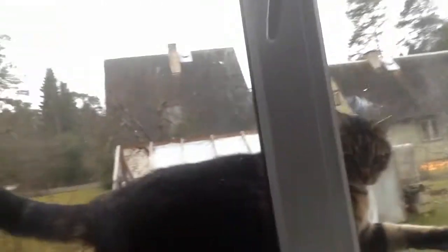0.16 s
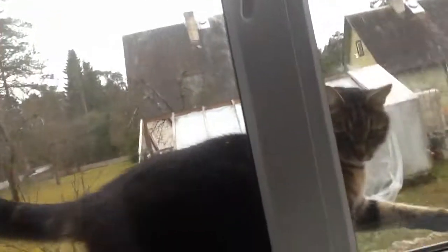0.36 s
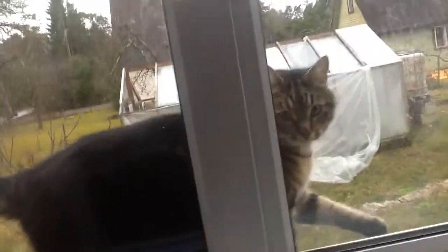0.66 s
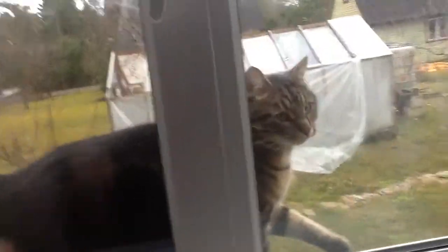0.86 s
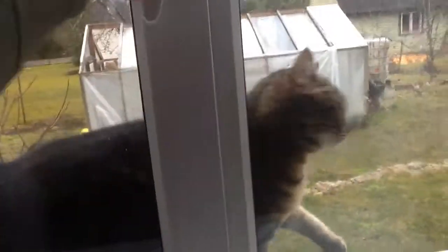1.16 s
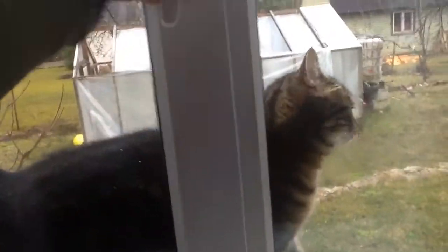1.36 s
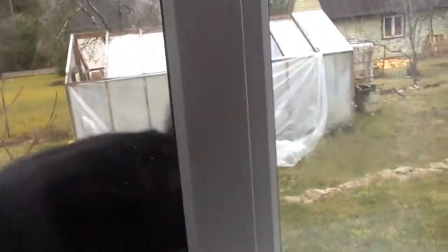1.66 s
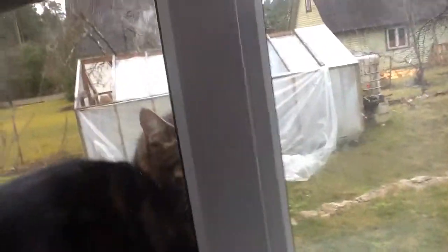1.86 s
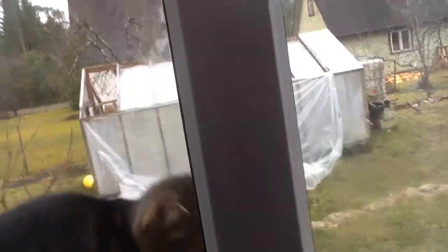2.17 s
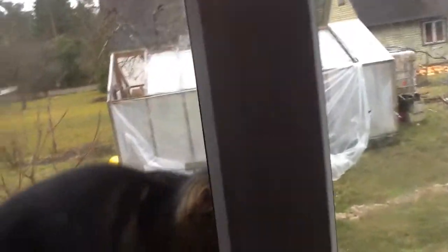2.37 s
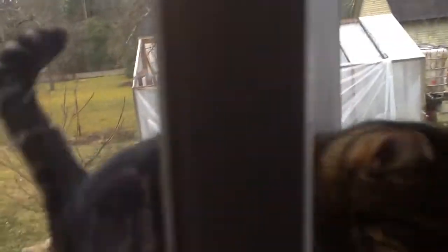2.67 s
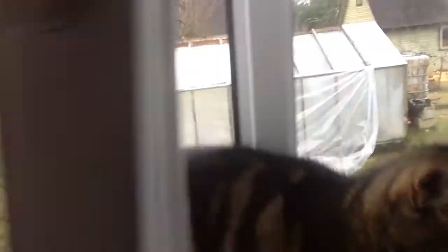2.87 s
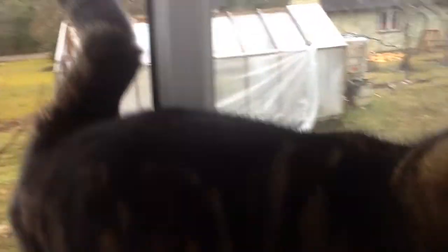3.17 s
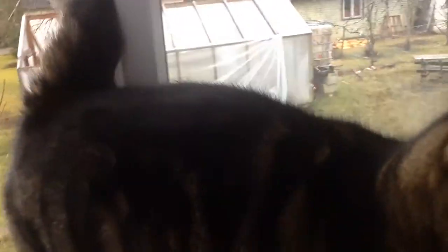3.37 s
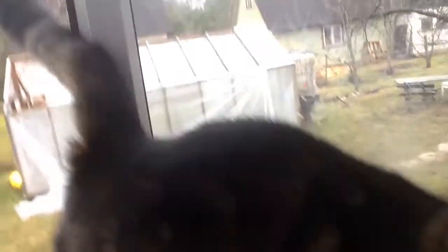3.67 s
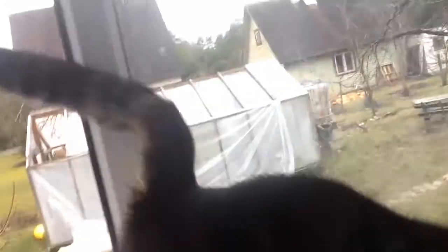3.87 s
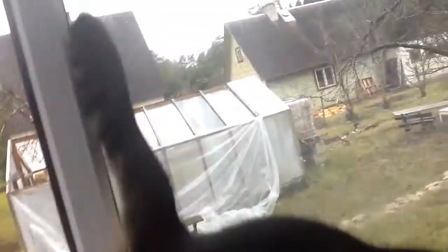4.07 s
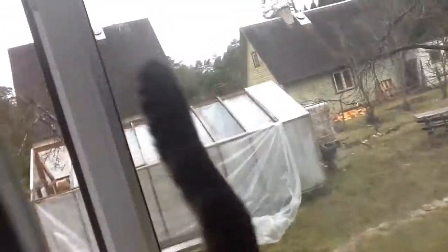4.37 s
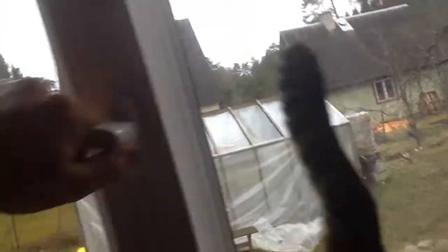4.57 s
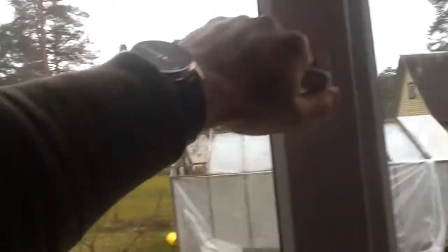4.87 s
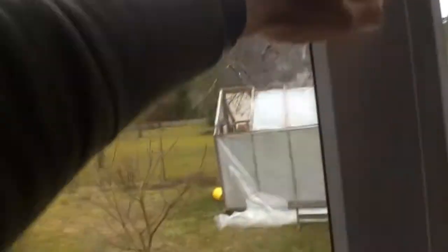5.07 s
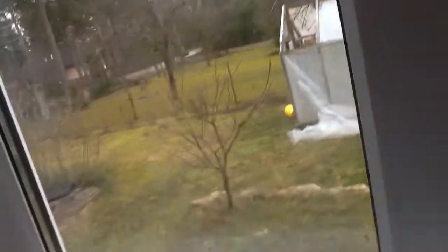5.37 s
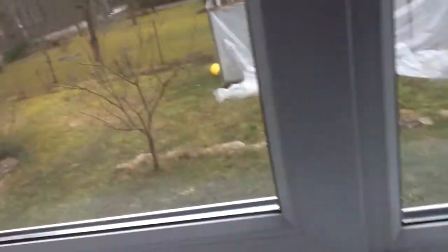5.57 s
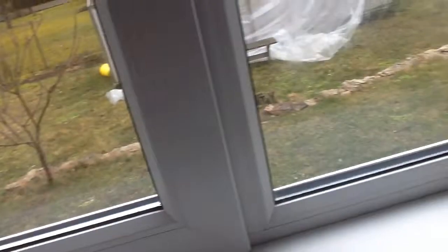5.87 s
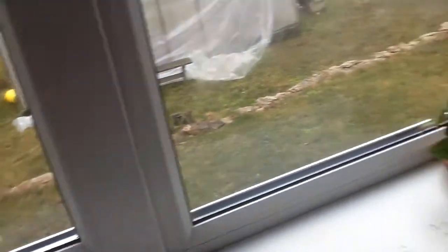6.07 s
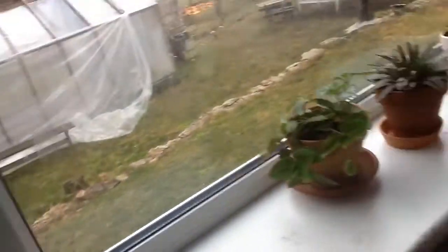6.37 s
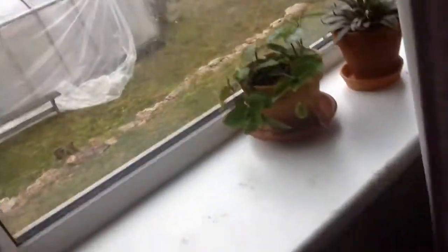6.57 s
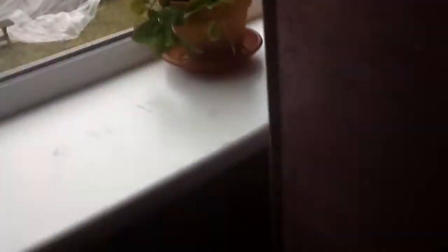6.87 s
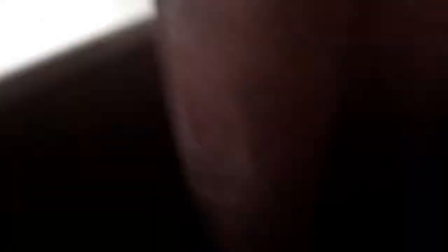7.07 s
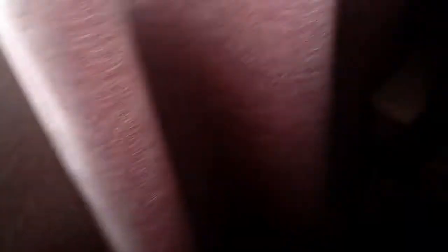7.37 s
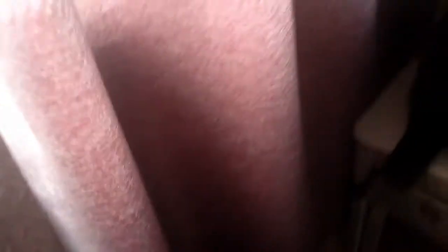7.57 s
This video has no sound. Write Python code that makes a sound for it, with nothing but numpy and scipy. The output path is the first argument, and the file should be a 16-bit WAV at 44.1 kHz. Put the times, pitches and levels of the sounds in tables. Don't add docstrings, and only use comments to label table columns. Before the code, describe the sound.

A window at arm's length in a small furnished room, heard through a hand-held phone with faint steady hiss. From 0 to 1 s, soft handling rumble, a few dull knocks around 0.3 and 0.6 s, and a faint hinge squeak. A sharp dry snap at 1.1 s opens a busy run of latch clicks, woody knocks, scrapes and rubbing, densest at 1.35-1.65 s, with further clacks at 1.8 and 1.95 s. Then it turns very quiet: a small tick at 2.5 s, soft padded thuds near 2.7-3.0 s, barely audible squeaks, light clicks at 4.15-4.4 s. At 4.93 s the sash slams, by far the loudest event, a double-contact bang with bright metallic crack and short pane ring. Latch clicks follow, low thumps and frame groans at 5.3-6.1 s, small ticks at 6.55 s, curtain rustling around 6.7-7.2 s, a knock at 7.23 s, and a faint tap at 7.6 s.

```python
import sys
import numpy as np
from scipy import signal
from scipy.fft import rfft, irfft, next_fast_len
from scipy.io import wavfile
from scipy.ndimage import uniform_filter1d

SR = 44100
rng = np.random.default_rng(int(sys.argv[2]) if len(sys.argv) > 2 else 0)


def master(y):
    cut = np.clip(np.atleast_2d(y).T, -1, 1)
    pcm = np.round(cut * 32767)
    wavfile.write(sys.argv[1], SR, pcm.astype(np.int16))


def nominal_scale(level):
    x = np.asarray(level, float) / 20
    return 10 ** x


N = 340893

# frequency in Hz, width in Hz, level in dB.
FRAME_MODES = [(136.2, 55, -4.5), (170.8, 20.2, 2), (213.4, 12.6, -2.5), (261.1, 8.9, -0.5),
               (298, 9.5, -0.5), (393.6, 51, -2.5), (476, 40, -5.5), (580.4, 9.6, -5)]


def unit(x):
    return x / np.sqrt(np.mean(x ** 2))


def ring(x, hz, width):
    hz = min(hz, 0.45 * SR)
    return signal.lfilter(*signal.iirpeak(hz, hz / max(width, 5), SR), x)


def body(x, modes, count=1):
    total = 0
    for k, (hz, width, db) in enumerate(modes):
        total = total + (-1) ** (k // count) * nominal_scale(db) * ring(x, hz, width)
    return total


def grit(count, spread_db):
    size = np.minimum(rng.exponential(size=count), 4)
    return unit(rng.standard_normal(count) * nominal_scale(spread_db * size))


def walk(rate):
    hold = int(SR / rate)
    levels = np.repeat(rng.standard_normal(N // hold + 1), hold)
    return 1.24 * uniform_filter1d(levels, hold)[:N]


def fade(t, rise, t60):
    return (1 - np.exp(-t / max(rise, 1e-4))) * np.exp(-np.log(1000) * t / max(t60, 0.003))


def add(out, s, x):
    i = int(s * SR)
    out[i:i + len(x)] += x[:len(out) - i]


def hiss_and_air():
    # frequency in Hz, density in dB per Hz.
    spectrum = [(30, -14), (100, -28), (145, -5.5), (296, 0.5), (520, -7.5), (2000, -9.5), (10200, -14.5),
                (15300, -15.5)]
    hz, db = np.transpose(spectrum)
    size = next_fast_len(N)
    gain = nominal_scale(np.interp(np.log(np.fft.rfftfreq(size, 1 / SR) + 1), np.log(hz), db))
    noise = irfft(rfft(rng.standard_normal(size)) * gain, size)[:N]
    return unit(noise) * nominal_scale(-64 + 0.3 * walk(2))


def pressure():
    # time in seconds, level in dB.
    bustle = [(0, -53.5), (1.0, -56), (1.62, -55.5), (1.71, -69), (2.15, -79), (2.42, -67), (2.9, -67.5),
              (3.4, -71.5), (4.2, -73), (4.5, -70.5), (4.88, -62), (5.2, -58.5), (5.5, -62.5), (6.0, -66),
              (6.25, -61.5), (7.0, -55.5), (7.22, -73), (7.73, -97)]
    bustle_db = (-2.5, -1.5, -5, -6)
    # start in seconds, length in seconds, rumble in dB, scrape in dB above rumble.
    shifts = [(0, 0.087, -46, 0), (0.266, 0.2, -54.5, 7.5), (1.047, 0.19, -47.5, -6),
              (1.326, 0.1, -48.5, -4), (1.378, 0.29, -42.5, 1), (1.407, 0.076, -40, 4.5),
              (1.736, 0.069, -53, 4.5), (1.761, 0.23, -43, -1), (1.912, 0.18, -52.5, -6),
              (2.468, 0.2, -67.5, 3), (2.73, 0.097, -74, -1), (2.93, 0.07, -56, 1), (2.985, 0.13, -56, 1),
              (4.41, 0.037, -68, 6), (5.05, 0.082, -39, -1), (5.279, 0.12, -51, -6.5),
              (5.431, 0.078, -41.5, -2), (5.575, 0.11, -38, -18), (5.721, 0.11, -36.5, -25),
              (5.874, 0.086, -53, -14), (6.032, 0.1, -47, -8), (6.26, 0.21, -60.5, -16),
              (6.63, 0.089, -57, -3.5), (7.031, 0.14, -52.5, 9.5), (4.62, 0.5, -68, 6),
              (7.229, 0.13, -48.5, 6), (7.408, 0.07, -60.5, 2.5), (7.571, 0.031, -54.5, -16),
              (6.715, 0.047, -51, -7), (5.346, 0.05, -45, -8)]
    # middle in seconds, length in seconds, rasp in dB, hiss in dB above rasp.
    sweeps = [(0.066, 0.11, -73, -9), (.36, .11, -68, -9), (0.755, 0.075, -61.5, 14.5),
              (0.802, 0.15, -59, 1), (0.918, 0.31, -67.5, 10.5), (1.09, 0.094, -50, -2),
              (1.19, 0.071, -52, -4), (1.34, 0.025, -59.5, 14.5), (1.41, 0.15, -40.5, -8),
              (1.417, 0.034, -39, 1.5), (1.439, 0.03, -40.5, -2), (1.541, 0.14, -46.5, -9),
              (1.598, 0.11, -66, -13), (1.832, 0.26, -58.5, -12), (4.152, 0.25, -60, -12),
              (4.356, 0.29, -61.5, -11), (4.958, 0.073, -33, -22), (5.052, .11, -49, -24),
              (5.335, 0.1, -56.5, 5.5), (5.623, 0.17, -50, -11), (5.84, .09, -57, -8),
              (5.535, 0.053, -57, -2), (5.272, .06, -53.5, -13), (6.054, 0.087, -61, -3),
              (6.659, 0.057, -50.5, -2.5), (6.737, 0.084, -54, -10), (6.856, 0.15, -50.5, 2),
              (6.997, 0.17, -55, 3), (7.097, 0.048, -54, 13), (7.118, 0.12, -53, 9.5),
              (7.274, 0.11, -49, -10)]
    rise_s, sag_db, end_s = 0.02, -14, 0.06
    edge_db = -17

    t = np.arange(N) / SR
    busy_db = np.interp(t, *np.transpose(bustle))
    gains = [nominal_scale(busy_db + db) for db in bustle_db[:3]]
    gains.append(nominal_scale(-58 + bustle_db[3] + 0.36 * (busy_db + 61)))
    power = np.array(gains) ** 2
    for s, length, db, scrape_db in shifts:
        age = np.maximum(t - s, 0)
        fall_db = sag_db * age / length - 20 * np.maximum(age - length, 0) / end_s
        shape = np.minimum(age / rise_s, 1) * nominal_scale(fall_db)
        power[:2] += (nominal_scale(db + np.array([[0], [scrape_db]])) * shape) ** 2
    for s, length, db, hiss_db in sweeps:
        swell_db = edge_db * (2 * (t - s) / length) ** 2
        power[2:] += nominal_scale(db + np.array([[0], [hiss_db]]) + swell_db) ** 2
    return np.sqrt(power)


def rubbing():
    # frequency in Hz, width in Hz, level in dB.
    seal_modes = [(528, 180, 2), (950, 480, -0.5), (1570, 1110, -7)]
    rasp_modes = [(2700, 5060, 0), (4020, 3470, 3)]
    hiss_modes = [(5700, 5140, -0.5), (9660, 8500, -0.5), (13660, 4800, -3.5)]
    heavy, firm, light, soft = pressure()
    press = walk(40)
    damped_frame = [(hz, 1.55 * width, db) for hz, width, db in FRAME_MODES[:6]]
    rumble = unit(body(grit(N, 3.36), damped_frame)) * heavy * nominal_scale(2 * press)
    scrape = unit(body(grit(N, 3.9), seal_modes)) * firm * nominal_scale(-3 + press)
    rasp = unit(body(grit(N, 4.9), rasp_modes)) * light * nominal_scale(-6 + press)
    hiss = unit(body(grit(N, 4.5), hiss_modes)) * soft * nominal_scale(-6 + 0.5 * press)
    return rumble + scrape + rasp + hiss


def blows():
    # start in seconds, body in dB, hardness as knock in dB above body, ring t60 in seconds.
    impacts = [(0.048, -59, 0, 0.2), (0.306, -41, -12, 0.072), (0.354, -34, -3.5, 0.16),
               (0.581, -43.5, -9, 0.14), (0.934, -39, -29, 0.16), (1.053, -40.5, -3.5, 0.51),
               (1.369, -35.5, 14.5, 0.12), (1.405, -32.5, 2, 0.14), (1.788, -46.5, 13.5, 0.083),
               (2.027, -40, -24, 0.15), (2.729, -51.5, -14, 0.2), (2.937, -54.5, -10, 0.1),
               (3.015, -45, -23, 0.18), (4.9295, -24.5, 4.5, 0.23), (4.944, -20, -5.5, 0.2),
               (5.057, -40, -1, 0.096), (5.299, -46, -15, 0.15), (5.439, -41.5, -8, 0.19),
               (5.577, -31, -26, 0.15), (5.597, -28.5, -18, 0.14), (5.63, -31.5, -26, 0.12),
               (5.728, -35.5, -34, 0.2), (5.754, -33, -25, 0.12), (5.821, -38, -20, 0.08),
               (5.845, -35.5, -22, 0.042), (5.901, -45, -19, 0.2), (6.045, -43, -10, 0.15),
               (6.083, -37, -23, 0.065), (7.024, -32, -5.5, 0.06), (7.232, -32, 2, 0.17)]
    # frequency in Hz, width in Hz, level in dB.
    wall_modes = [(32, 20, -2), (112, 30, -3)]
    knock_modes = [(720, 630, 8), (1030, 410, 13), (1330, 850, 7.5), (1940, 580, -3.5)]
    crack_modes = [(3100, 1100, 18), (4230, 1900, 19), (6740, 3800, 17), (8500, 2700, -33)]
    out, t = np.zeros(N), np.arange(SR // 2) / SR
    for s, db, hard_db, t60 in impacts:
        rattle = grit(len(t), 8.4) * fade(t, 0.00049, 0.5 * t60)
        contact = nominal_scale(13.5 + 0.2 * min(hard_db, 0)) * t * np.exp(-t / 0.00044) / 0.00084
        push = rattle + contact
        low = body(push, FRAME_MODES, count=3)
        low = low / np.abs(low).max()
        wall = body(push, wall_modes, count=2)
        wall = wall / np.abs(wall).max()
        knock = unit(body(grit(len(t), 6.5), knock_modes)) * fade(t, 0.00027, 0.98 * t60)
        crack = unit(body(grit(len(t), 29), crack_modes)) * fade(t, 0.00087, 0.18 * t60)
        wall_db = -25 + 0.6 * (db + 36)
        crack_db = -8 + 0.71 * hard_db
        blow = low + nominal_scale(wall_db) * wall + nominal_scale(hard_db - 9) * knock + nominal_scale(crack_db) * crack
        add(out, s, nominal_scale(db) * blow)
    return out


def rings():
    # start in seconds, peak in dB, ring in Hz, t60 in seconds.
    tapped_parts = [(1.05, -43, 525, .06), (1.482, -34, 1356, 0.038), (1.87, -36, 750, 0.032),
                    (2.478, -46, 2630, 0.028), (2.48, -47.5, 1594, 0.039), (2.62, -58, 1110, .05),
                    (2.995, -56, 557, .05), (3.011, -52, 882, .09), (3.015, -52, 618, 0.1),
                    (4.929, -23, 870, 0.064), (4.931, -33, 1336, 0.05), (4.932, -25.5, 567, .15),
                    (4.935, -29, 108, .3), (4.94, -27, 200, .15), (4.945, -24, 937, 0.066),
                    (4.94, -36, 383, .15), (5.1, -45, 84.8, 0.26), (4.9547, -25, 4100, .012),
                    (5.062, -36, 569, .05), (5.065, -38, 131, .2), (5.09, -40, 585, 0.066),
                    (5.578, -40, 677, 0.081), (5.579, -37.5, 454, 0.087), (5.582, -42, 873, .1),
                    (5.594, -32, 191, .1), (5.598, -36, 610, .1), (5.598, -34.5, 341, 0.15),
                    (5.625, -48, 1090, 0.045), (5.727, -36, 409, .15), (5.73, -52, 870, 0.093),
                    (5.74, -37, 180, .12), (5.75, -43, 500, .07), (5.755, -43, 762, 0.082),
                    (5.775, -42, 500, .07), (5.775, -39, 238, .15), (5.815, -50, 168.7, 0.05),
                    (5.82, -39, 237, 0.08), (5.895, -51, 200, 0.1), (5.89, -58.5, 995, 0.33),
                    (6.047, -47, 221, 0.14), (6.547, -40, 780, 0.029), (6.5382, -39, 1520, 0.014),
                    (7.238, -38.5, 254, 0.1), (7.42, -59.5, 179, 0.33), (7.582, -48, 210, .06),
                    (0.049, -38, 520, .03), (0.309, -37, 300, .05), (1.949, -40, 3370, 0.011),
                    (5.44, -56, 1500, .04),
                    (1.332, -39, 2700, .025), (1.333, -42, 4750, .02), (1.334, -43, 1400, .02),
                   (1.167, -49, 3600, .02), (1.482, -40, 2150, .015), (4.933, -22.5, 3130, .035),
                   (4.9285, -30, 800, .02), (5.056, -38, 2500, 0.018), (5.062, -37, 1200, .03),
                   (5.066, -42, 1800, .05), (5.103, -48, 3130, .03), (1.791, -36, 970, .03),
                   (1.806, -40, 1250, .03), (1.85, -46, 860, .03), (4.421, -54, 2800, .02),
                   (7.019, -39, 622, .02), (7.02, -46, 1620, .012), (7.233, -37, 1480, .025),
                   (7.256, -44, 3300, .015), (7.26, -39, 700, .04), (1.278, -48, 1250, .012),
                   (1.124, -46, 1100, .015), (2.997, -50, 540, .015), (5.316, -52, 9500, .03),
                   (5.368, -47, 6900, 0.016), (5.598, -29, 328, 0.037), (5.583, -33, 380, .05),
                   (5.6, -36.5, 850, .05), (1.949, -37, 5700, 0.019), (1.95, -38, 6500, 0.019),
                   (2.478, -51, 3500, .015), (7.582, -48, 800, .01), (5.632, -35, 300, .04),
                   (5.61, -38, 450, .06), (5.735, -37, 480, .06), (5.79, -41, 350, .06),
                   (5.84, -42, 327, .05), (5.408, -40, 390, 0.011), (5.439, -47, 1900, .03),
                   (5.652, -47, 1500, .02), (1.483, -33, 1010, .02), (1.514, -40, 1920, .015),
                   (1.622, -40, 1360, .015), (1.622, -46, 3000, .01), (1.794, -37, 700, .04),
                   (1.797, -39, 1700, .03), (7.582, -48, 1860, .01), (7.6075, -49, 1300, .01),
                   (.31, -38, 420, .02), (.937, -42, 240, .03), (.385, -42, 250, .03),
                   (1.42, -31, 800, 0.033), (1.44, -36, 1100, .02)]
    out, t = np.zeros(N), np.arange(SR // 2) / SR
    for s, db, hz, t60 in tapped_parts:
        add(out, s, nominal_scale(db) * fade(t, 0.9 / hz, t60) * np.sin(2 * np.pi * hz * t))
    return out


def hard_points(table, share):
    out, t = np.zeros(N), np.arange(SR // 8) / SR
    for s, db, hz, t60 in table:
        click = nominal_scale(9.5) * (t == 0)
        push = (click + rng.standard_normal(len(t))) * fade(t + 0.00018, 0.00015, t60)
        width = 1.55 * share * hz
        tick = ring(ring(push, hz, width), hz, width)
        add(out, s, nominal_scale(db - 3.5) * tick / np.abs(tick).max())
    return out


def dry_snaps():
    # start in seconds, peak in dB, ring in Hz, t60 in seconds.
    snap_table = [(0.0498, -58, 3000, 0.019), (0.36, -46, 5200, 0.01), (1.096, -20.5, 2800, 0.0069),
                  (1.332, -31.5, 3600, 0.016), (1.3733, -25, 3200, 0.028), (1.946, -38, 6000, 0.006),
                  (6.6593, -37.5, 3000, 0.024), (7.582, -54, 2300, 0.01), (1.099, -30, 1560, 0.015),
                  (1.6, -41, 1800, 0.013), (1.622, -40, 5500, 0.013), (1.8695, -44, 6000, 0.008),
                  (1.421, -24.5, 1450, 0.028), (7.02, -36.5, 1700, 0.02), (1.797, -27, 940, 0.033),
                  (4.5, -46, 2600, 0.016), (1.948, -35.5, 10000, 0.017), (5.408, -43, 2200, 0.008)]
    return hard_points(snap_table, 0.51)


def ticks():
    # start in seconds, peak in dB, ring in Hz, t60 in seconds.
    tick_table = [(0.05, -37.5, 1160, 0.013), (0.086, -45, 930, 0.03), (0.36, -36, 1450, 0.039),
                  (0.829, -40, 1040, 0.025), (0.85, -43, 870, 0.025), (1.064, -35, 940, 0.013),
                  (1.293, -37, 1050, 0.05), (1.37, -26, 800, 0.014), (1.483, -27.5, 1300, 0.017),
                  (1.508, -33.5, 1060, 0.21), (1.568, -30, 1150, 0.071), (1.622, -32.5, 1310, 0.03),
                  (1.79, -25.5, 1300, 0.046), (1.8695, -37, 1500, 0.012), (1.949, -25, 980, 0.028),
                  (2.479, -56, 500, 0.03), (4.179, -51, 1490, 0.041), (4.423, -46, 630, 0.031),
                  (4.9285, -31, 1500, 0.011), (5.061, -30, 1300, 0.033), (5.302, -39.5, 930, 0.024),
                  (5.408, -43, 1214, 0.015), (5.439, -42, 890, 0.047), (5.595, -37, 795, 0.15),
                  (6.043, -37.5, 980, 0.028), (6.539, -33, 1000, 0.01), (6.5465, -35, 1110, 0.011),
                  (7.019, -39.5, 665, 0.04), (7.582, -40.5, 1300, 0.0074), (7.6075, -44, 702, 0.008)]
    return hard_points(tick_table, 0.5)


def metal_clicks():
    # start in seconds, peak in dB, ring in Hz, t60 in seconds.
    click_table = [(0.0864, -32.5, 2220, 0.0066), (0.2882, -51, 5070, 0.018), (0.3094, -59, 3640, 0.023),
                   (1.1688, -39.5, 2690, 0.069), (1.19, -42, 2700, 0.07), (1.292, -38.5, 2180, 0.022),
                   (1.3634, -26, 4770, 0.036), (1.5075, -27, 3700, 0.0096), (1.5433, -29, 9200, 0.01),
                   (1.5537, -34, 3450, 0.015), (1.5687, -27, 3450, 0.007), (1.6616, -37, 3950, 0.013),
                   (1.7895, -40, 5000, 0.01), (1.852, -46, 6000, 0.012), (1.948, -32, 6100, 0.019),
                   (2.478, -48, 4200, 0.012), (2.5394, -52, 5140, 0.025), (4.1405, -38, 3020, 0.011),
                   (4.18, -48, 4100, 0.02), (4.9338, -20, 4800, 0.022), (4.9445, -11, 3860, 0.011),
                   (5.0559, -34.5, 2660, 0.074), (5.1028, -38.5, 3100, 0.025), (5.3275, -36.5, 4920, 0.033),
                   (5.3694, -45, 3300, 0.025), (5.6501, -42.5, 6690, 0.025), (5.7538, -44, 3480, 0.027),
                   (7.233, -30.5, 2700, 0.027), (5.651, -45, 1510, 0.03), (5.896, -52, 1060, 0.04)]
    return hard_points(click_table, 0.28)


def room(x):
    t = np.arange(SR // 2) / SR
    noise = rng.standard_normal(len(t))
    low = signal.lfilter(*signal.butter(1, 1500, fs=SR), noise)
    tail = low * fade(t, 0.00086, 0.38) + (noise - low) * fade(t, 0.00074, 0.22)
    return signal.fftconvolve(x, tail / np.linalg.norm(tail))[:N] * nominal_scale(-10)


def hinge():
    # start in seconds, end in seconds, start in Hz, end in Hz, level in dB.
    squeaks = [(.125, .22, 1330, 1290, -65), (.2, .3, 1270, 1200, -72), (.48, .58, 1200, 1150, -70),
               (6.13, 6.15, 840, 900, -74), (6.11, 6.13, 570, 580, -72), (2.53, 2.8, 2480, 2450, -86),
               (3.12, 3.19, 3000, 2950, -81), (3.22, 3.28, 2250, 2200, -83), (3.68, 3.8, 4600, 4400, -85),
               (3.76, 3.83, 3900, 3800, -85), (4.09, 4.19, 1940, 1900, -81), (4.15, 4.44, 2020, 2060, -84),
               (4.2, 4.235, 5300, 4500, -83), (4.255, 4.41, 2430, 2230, -78), (4.29, 4.32, 4750, 5150, -80),
               (4.145, 4.2, 3250, 3250, -80), (4.912, 4.935, 560, 640, -54)]
    out = np.zeros(N)
    for start, end, hz0, hz1, db in squeaks:
        n = int((end - start) * SR)
        blur = 1 + 0.006 * walk(30)[:n] + 0.022 * walk(400)[:n]
        hz = np.linspace(hz0, hz1, n) * blur
        stutter = 0.8 + 0.5 * uniform_filter1d(walk(200), 400)[:n]
        grip = np.sin(np.pi * np.linspace(0, 1, n) ** 0.72)
        tone = np.sin(2 * np.pi * np.cumsum(hz) / SR)
        add(out, start, nominal_scale(db + 15) * stutter * grip * tone)
    return out


def groans():
    # start in seconds, end in seconds, tone in Hz, level in dB.
    presses = [(5.815, 5.872, 172, -36), (5.0, 5.052, 257, -33), (5.725, 5.8, 200, -43),
               (5.765, 5.8, 470, -47), (5.578, 5.64, 200, -38.5), (5.58, 5.64, 400, -38),
               (6.082, 6.104, 195, -44), (2.936, 2.962, 235, -49.5), (3.012, 3.06, 172, -50.5),
               (1.79, 1.822, 450, -39.5), (1.915, 1.935, 168, -46.5), (2.025, 2.048, 176, -46.5),
               (7.022, 7.045, 196, -38.5), (6.148, 6.168, 870, -52.5), (6.112, 6.132, 570, -54.5),
               (5.06, 5.075, 577, -34.5)]
    out = np.zeros(N)
    for start, end, hz, db in presses:
        t = np.arange(int((end - start) * SR)) / SR
        swell = signal.windows.tukey(len(t), 0.57)
        add(out, start, nominal_scale(db) * swell * np.sin(2 * np.pi * hz * t))
    return out


def slam():
    # start in seconds, level in dB.
    contacts = [
        (4.932, -29),
        (4.944, -23),
    ]
    # frequency in Hz, level in dB, t60 in seconds.
    pane_modes = [(171, 4.5, 0.14), (228, 0, 0.17), (252.7, 6, 0.29), (292, -13, 0.3), (314.6, 1, 0.183),
                  (576, -1.5, 0.15), (516, -5.5, 0.1), (375.6, -0.5, 0.21), (752, -13, 0.18),
                  (870, -9, 0.055), (1320, 0, 0.039), (3100, 8, 0.021), (138.3, 1, 0.217)]
    out, t = np.zeros(N), np.arange(SR // 2) / SR
    for s, db in contacts:
        for hz, mode_db, t60 in pane_modes:
            phase = rng.uniform(0, 2 * np.pi)
            mode = fade(t, 0.0042, t60) * np.sin(2 * np.pi * hz * t + phase)
            add(out, s, nominal_scale(db + mode_db) * mode)
    return out


def scene():
    struck = blows() + slam() + rings() + ticks() + metal_clicks() + dry_snaps()
    near = struck + hinge()
    return (near + room(near) + groans() + rubbing() + hiss_and_air())[None]


def low_pass(x):
    return signal.sosfilt(signal.butter(12, 16330, fs=SR, output="sos"), x)


def record(dry):
    thin = signal.sosfilt(signal.butter(2, 85, "high", fs=SR, output="sos"), dry)
    thin = signal.sosfilt(signal.ellip(6, 0.3, 32, 15150, fs=SR, output="sos"), thin)
    return low_pass(thin)


dry = scene()
out = record(dry)
master(out)
```